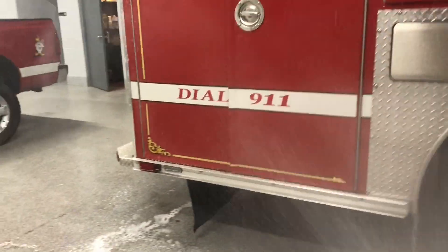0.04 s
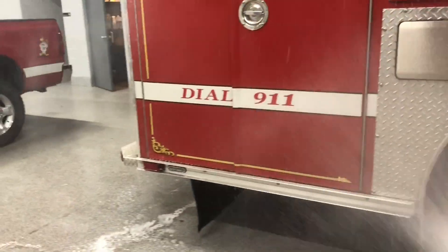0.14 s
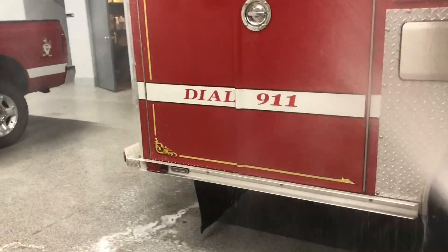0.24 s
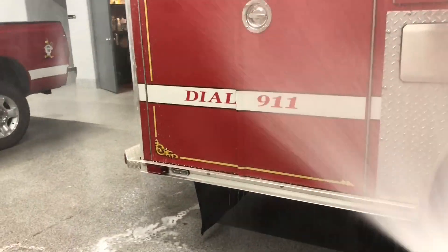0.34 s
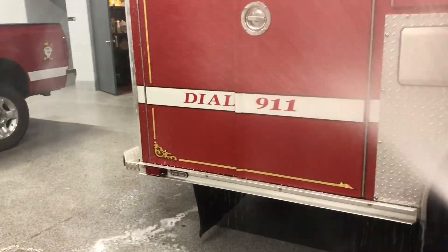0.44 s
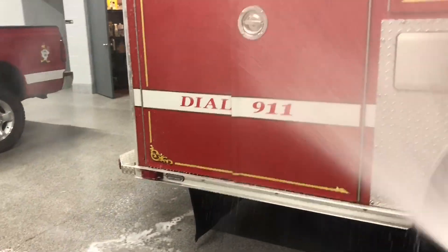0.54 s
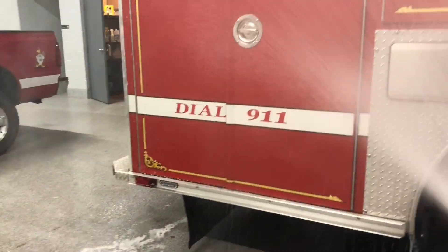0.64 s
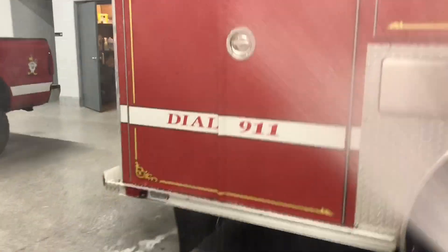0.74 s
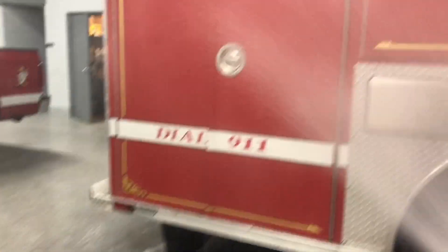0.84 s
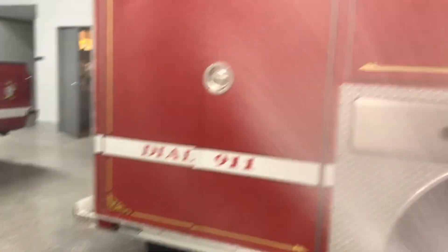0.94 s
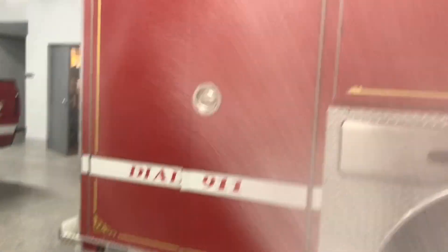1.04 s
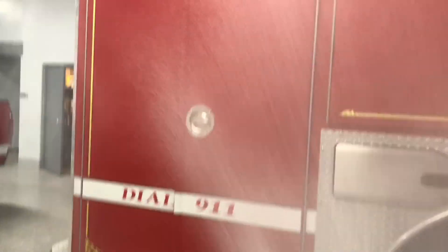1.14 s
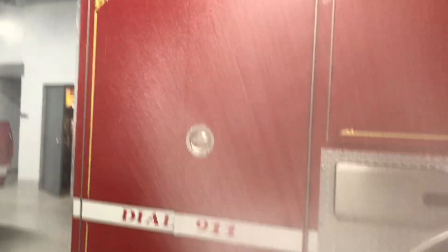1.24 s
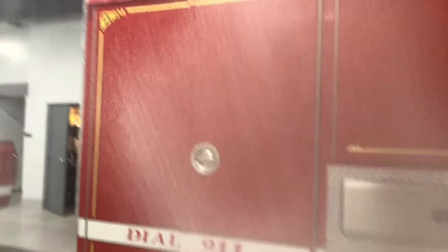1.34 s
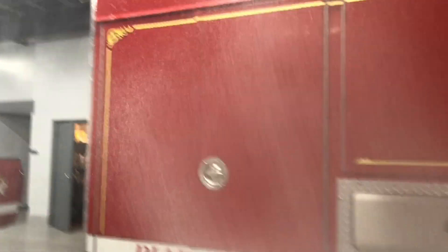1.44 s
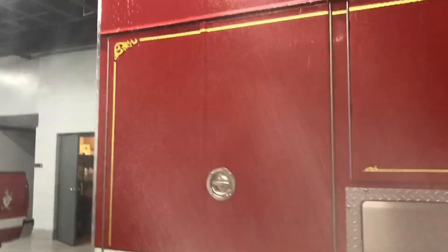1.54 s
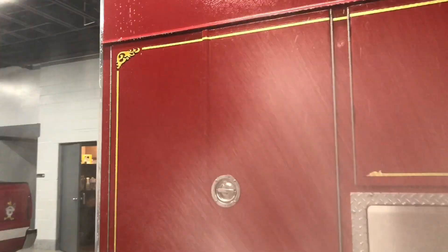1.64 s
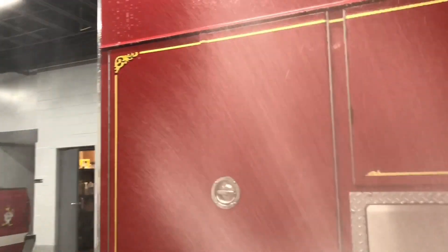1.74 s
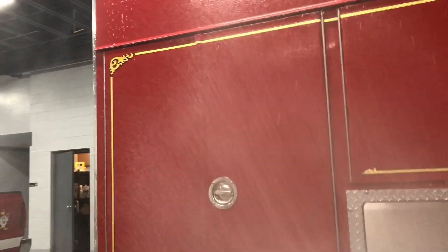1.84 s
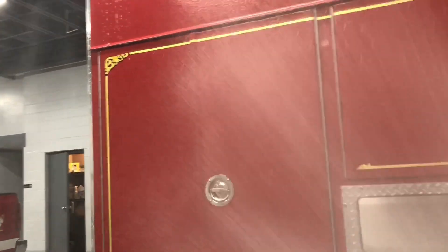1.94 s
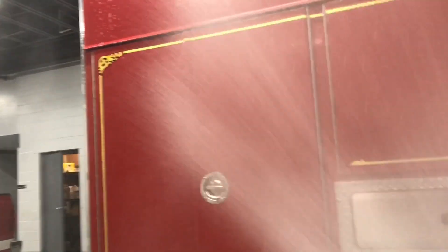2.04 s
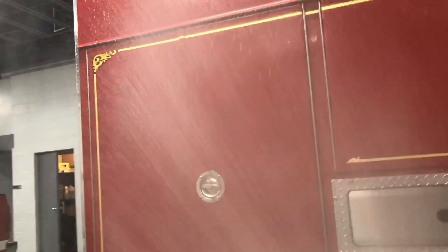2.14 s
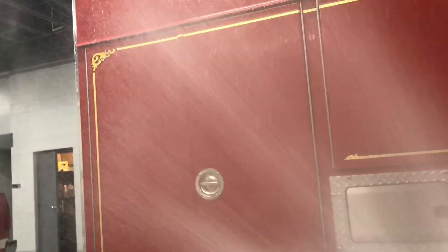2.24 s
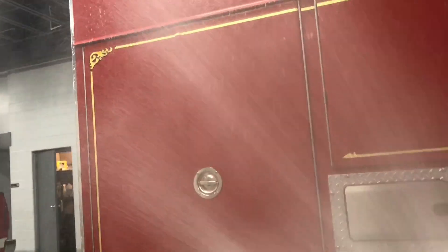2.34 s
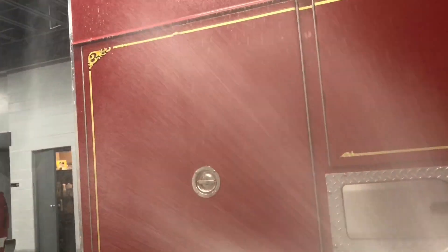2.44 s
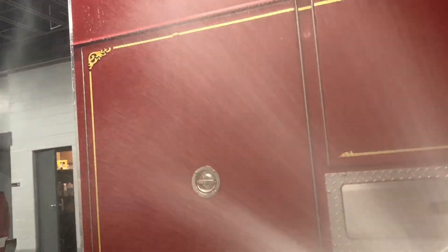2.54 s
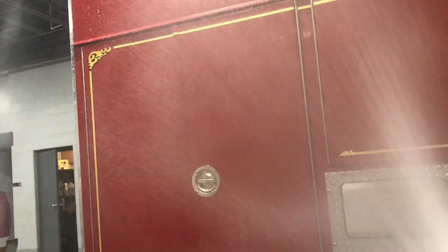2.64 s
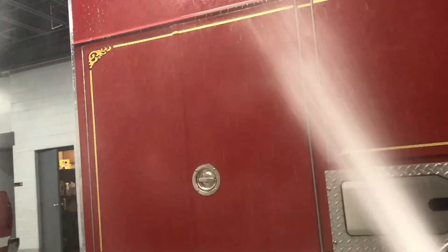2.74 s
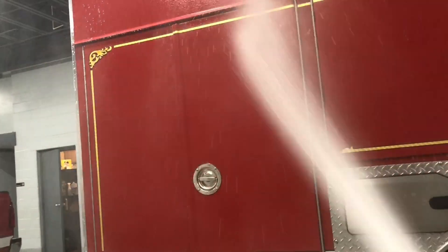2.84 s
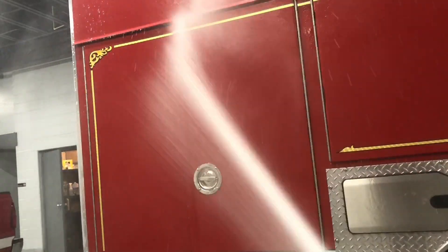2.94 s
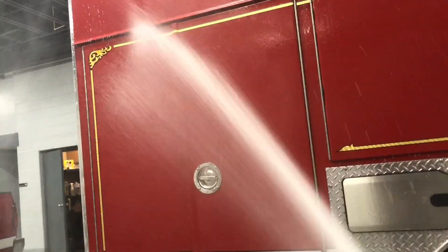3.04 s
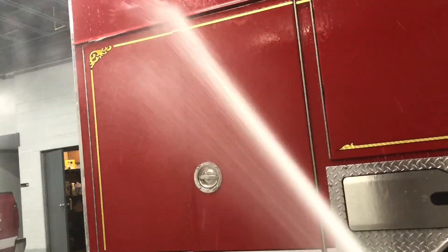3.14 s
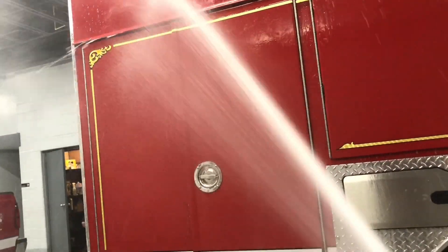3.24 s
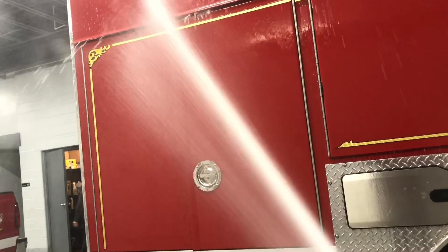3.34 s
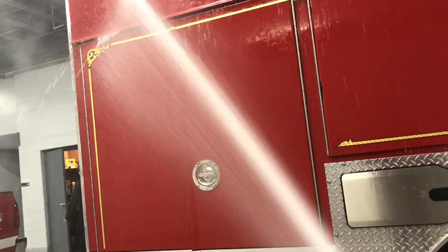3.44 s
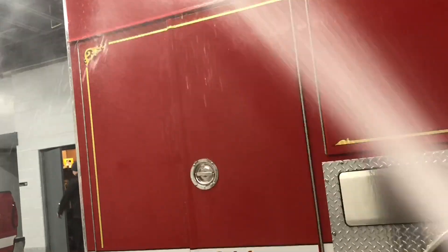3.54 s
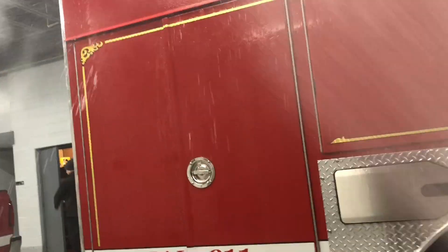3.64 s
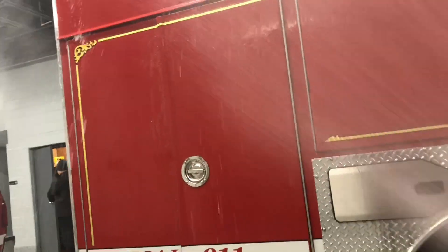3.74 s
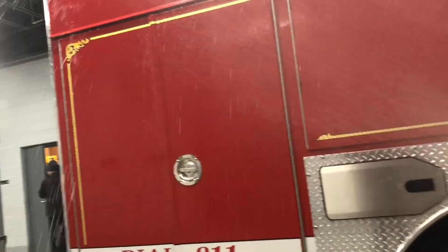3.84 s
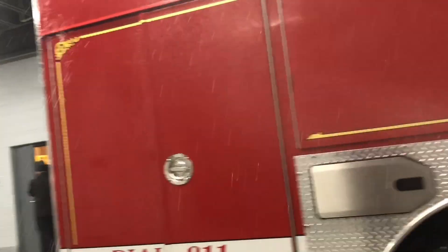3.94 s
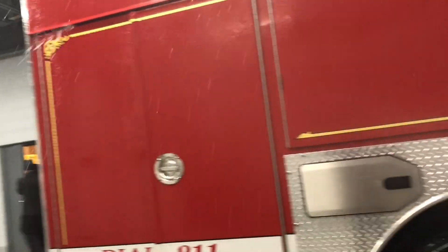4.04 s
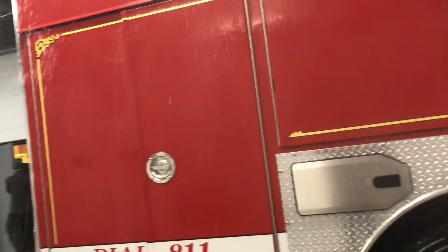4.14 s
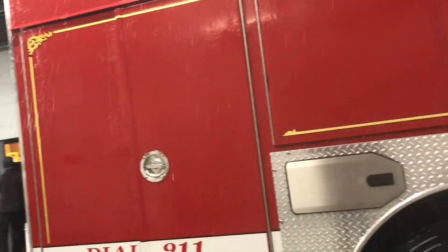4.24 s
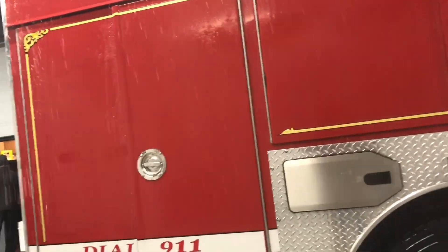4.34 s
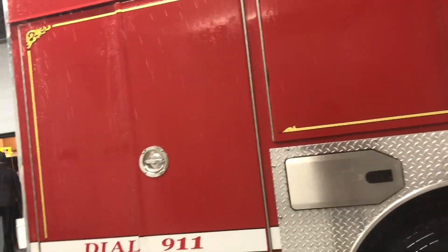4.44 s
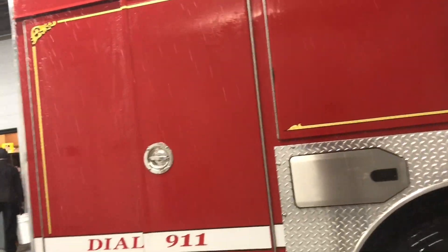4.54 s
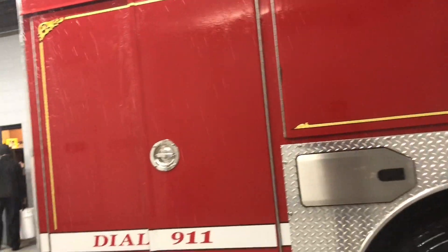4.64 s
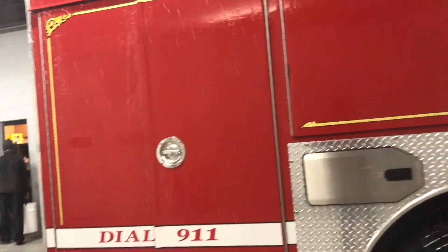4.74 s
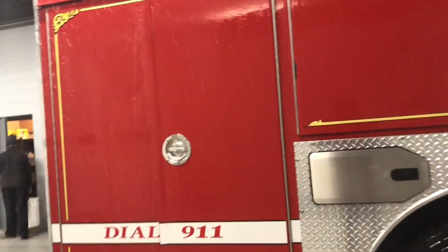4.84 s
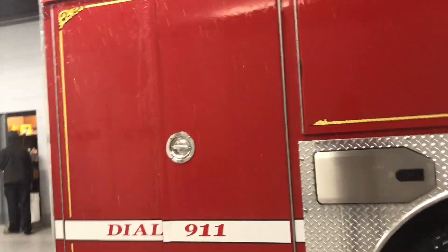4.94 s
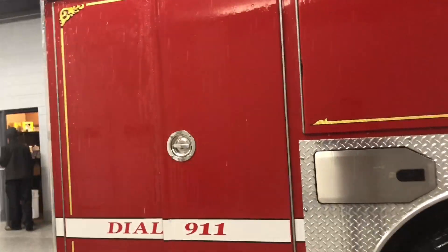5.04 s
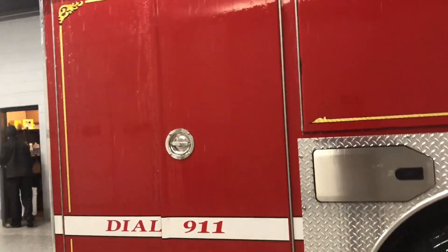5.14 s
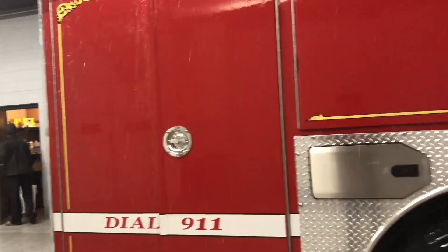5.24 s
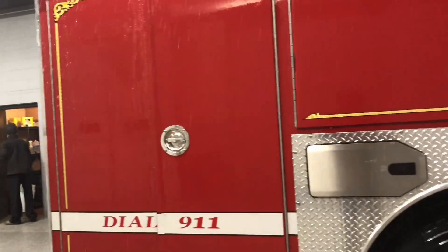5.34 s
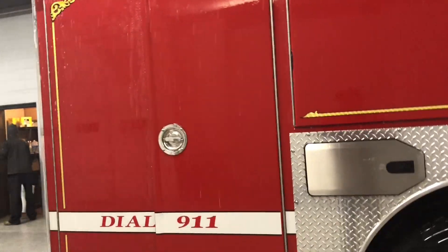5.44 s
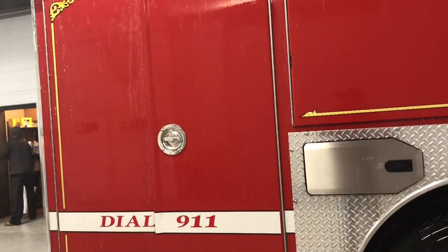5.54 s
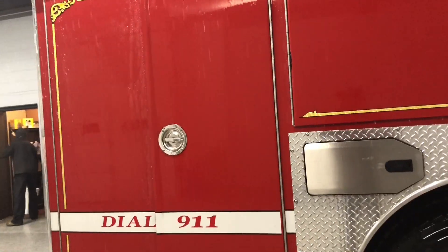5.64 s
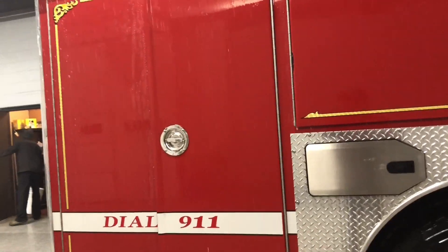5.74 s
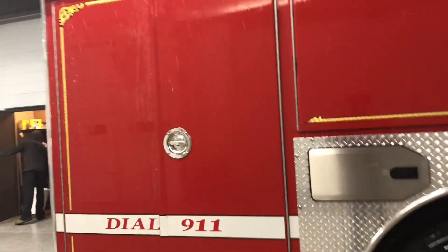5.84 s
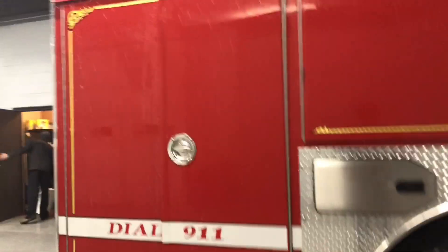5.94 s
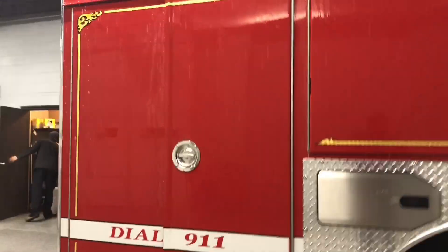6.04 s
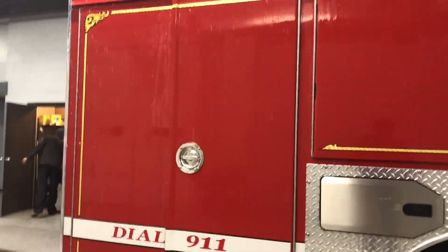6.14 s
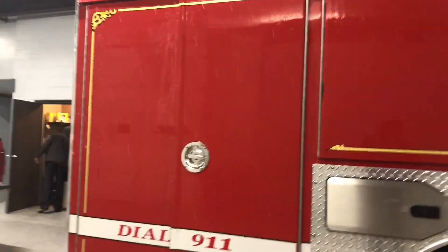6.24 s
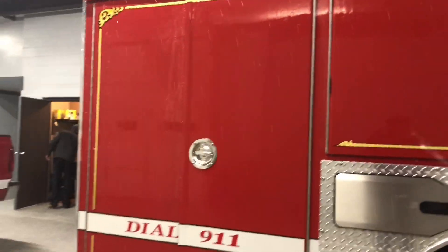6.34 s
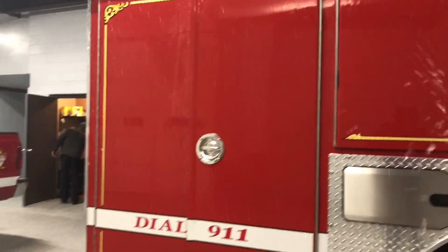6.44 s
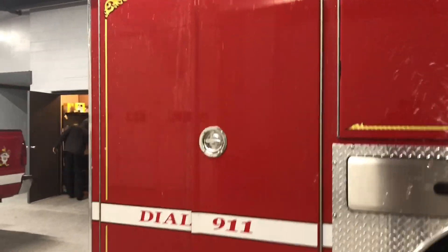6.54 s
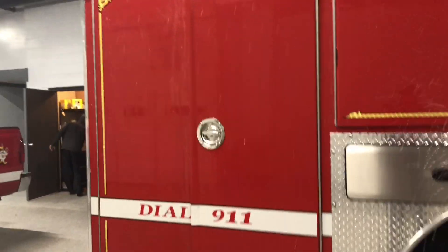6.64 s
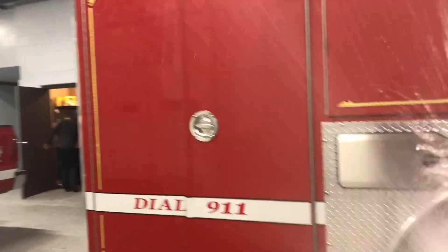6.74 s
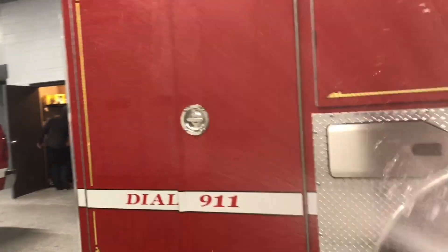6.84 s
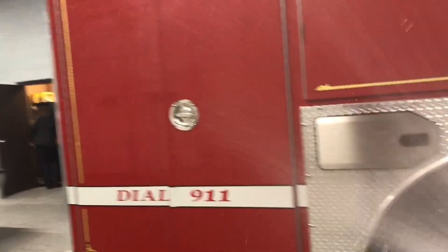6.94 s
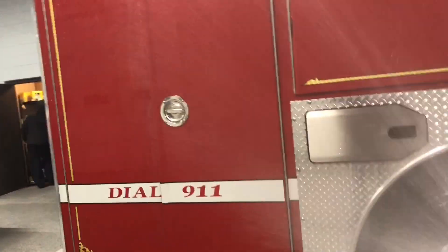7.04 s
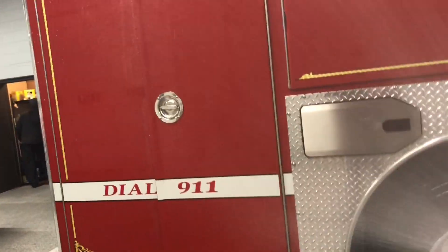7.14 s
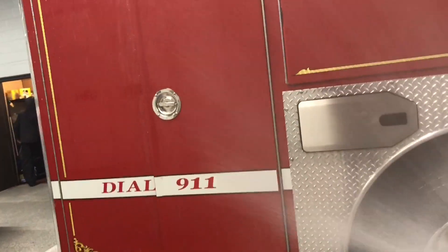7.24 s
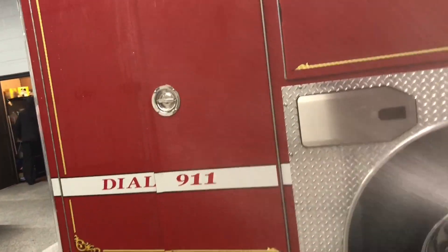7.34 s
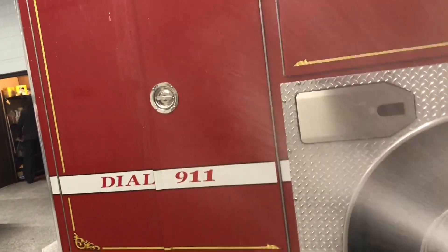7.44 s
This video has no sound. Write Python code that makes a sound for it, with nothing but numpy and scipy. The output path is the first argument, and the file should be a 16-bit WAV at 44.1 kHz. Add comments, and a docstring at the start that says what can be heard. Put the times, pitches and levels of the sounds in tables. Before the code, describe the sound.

A hose sprays hard on a truck's metal side in a garage, shuts off, leaves water dripping, then starts again.

```python
"""A wide fan of hose water drums and patters on the side of a truck, over the rumble of garage ventilation.
It narrows to a hissing jet, widens again and is shut off with a faint whistle of the valve. Water runs
off and drips onto the wet floor, something bangs across the bay and later thuds, and the spray starts
again on tread plate. The water sounds are random droplet impacts, coloured by the resonances of the
surfaces they strike; the bay adds its reverberation."""
import sys
import numpy as np
from scipy import signal
from scipy.fft import rfft, irfft
from scipy.io import wavfile
from scipy.ndimage import map_coordinates

SR = 44100
rng = np.random.default_rng(int(sys.argv[2]) if len(sys.argv) > 2 else 0)


def put_to_file(sound):
    """Save the sound as 16-bit audio at rate SR, in the file named by the first command-line argument."""
    columns = np.atleast_2d(sound).T  # one column per channel
    safe = np.clip(columns, -1, 1)
    whole_steps = np.round(safe * 32767)
    wavfile.write(sys.argv[1], SR, whole_steps.astype(np.int16))


N = 329427
TIME = np.arange(N) / SR
BAND_LIMIT_HZ = 15800
NARROW_AT_S, WIDEN_AT_S = 2.6, 3.544  # the nozzle is turned to a jet and back to a fan
SHUT_AT_S, OPEN_AT_S, SPREAD_S = 3.868, 6.682, 0.074  # the flow ends, restarts and spreads to a fan


def amp(db):
    """Amplitude ratio of a level in decibels."""
    return 10 ** (np.asarray(db) / 20)


def unit_rms(x):
    """Normalisation to an rms of 1."""
    return x / np.sqrt(np.mean(x ** 2) + 1e-20)


def at_hz(points, hz):
    """Interpolation along a logarithmic frequency axis."""
    f, value = np.transpose(points)
    return np.interp(np.log(hz + 1), np.log(f + 1), value)


def add(mix, start_s, sound):
    """Superposition of a sound on the mix."""
    part = mix[round(start_s * SR):][:len(sound)]
    part += sound[:len(part)]


def ramp(start_s, length_s):
    """Linear rise from 0 to 1."""
    return np.clip((TIME - start_s) / length_s, 0, 1)


def swell(top_s, db, rise_s, fall_s):
    """Gaussian envelope with separate widths before and after its top."""
    return amp(db) * np.exp(-((TIME - top_s) / np.where(TIME < top_s, rise_s, fall_s)) ** 2)


def waver(rate_hz):
    """Random modulation: low-pass noise of rms 1."""
    hz = np.fft.rfftfreq(N, 1 / SR)
    return unit_rms(irfft(rfft(rng.standard_normal(N)) / (1 + (hz / rate_hz) ** 2), N))


def impacts(per_s, spread_db):
    """Shot noise: independent impulses of random size and sign; rms 1."""
    size = amp(spread_db * np.minimum(rng.exponential(1, N), 6))
    return unit_rms(size * rng.choice([-1, 1], N) * (rng.random(N) < per_s / SR))


def colour(x, spectrum, rings=()):
    """Minimum-phase filtering imposes a spectrum while clicks keep their sharp fronts; rms 1."""
    hz = abs(np.fft.fftfreq(2 ** 13, 1 / SR))
    db = at_hz(spectrum, hz) + sum(lift / (1 + (2 * (hz - f) / width) ** 2) for f, width, lift in rings)
    response = np.exp(np.conj(signal.hilbert(np.log(amp(db)))))
    taps = np.fft.ifft(response).real[:2 ** 12]
    return unit_rms(signal.oaconvolve(x, taps)[:len(x)])


def resonate(x, hz, width_hz):
    """Forced response of a damped resonator whose frequency may move."""
    carrier = np.exp(2j * np.pi * np.cumsum(hz * np.ones(len(x))) / SR)
    pole = np.exp(-np.pi * width_hz / SR)
    return 2 * (carrier * signal.lfilter([1 - pole], [1, -pole], x / carrier + 1e-18)).real


def narrow_band(x, hz, width_hz):
    """Two resonators in cascade pass a band with steeper skirts; rms 1."""
    return unit_rms(resonate(resonate(x, hz, width_hz), hz, width_hz))


def narrowed():
    """Nozzle setting over time: 0 is the wide fan, 1 the narrow jet."""
    return ramp(NARROW_AT_S, 0.042) - ramp(WIDEN_AT_S, 0.15)


def fan_db(sweep):
    """Angle of incidence: a fan that meets the metal squarely patters more and throws less mist."""
    s, splash_db, mist_db = np.transpose(sweep)
    patter_db = splash_db - 6.5 - 0.091 * (mist_db + 2.5)
    return np.array([np.interp(TIME, s, db) for db in (patter_db, splash_db, splash_db + mist_db)])


# The hand sweeps the fan over painted panels, and later over tread plate.
# Each row: time in seconds, relative splash level in dB, mist level against the splash in dB.
AIM_ON_PANELS = [(0.0, -29.5, -4), (0.19, -28.5, -3), (0.35, -24.5, -2), (0.88, -25, -2.5), (1.01, -23, -1),
                 (1.37, -22.5, -6.5), (1.49, -25, -6), (1.69, -21.5, -5.5), (1.85, -24.5, -4.5),
                 (2.01, -22, -1.5), (2.46, -23.5, -2), (2.6, -21.5, -2.5)]
AIM_ON_TREAD = [(6.71, -27, 2), (6.758, -28.5, 2), (6.888, -28.5, -3), (7.008, -29, 4), (7.192, -27.5, -4),
                (7.434, -25.5, -2.5), (7.45, -26.5, -4)]
def band_gains():
    """Aim, nozzle and flow set the excitation of three bands: low patter, splash and fine mist."""
    # Each triple is (patter, splash, mist).
    jet_db = (-37, -27, -30)
    raised_fan_db = (0.5, -1, -1.5)  # after the jet, the fan lands higher up the side
    seam_lift_db, seam_db_per_s = (-0.5, 8.5, 5.5), (2.5, 0.5, -4.5)  # the jet slides along a door seam
    seam_from_s, seam_to_s, edge_s = 2.885, 3.491, 0.0094
    on_seam = ramp(seam_from_s, edge_s) - ramp(seam_to_s - edge_s, edge_s)
    seam_db = np.outer(seam_lift_db, on_seam) + np.outer(seam_db_per_s, on_seam * (TIME - seam_from_s))
    wide_db = fan_db(AIM_ON_PANELS) + np.outer(raised_fan_db, TIME > WIDEN_AT_S)
    narrow = narrowed()
    panel_db = (1 - narrow) * wide_db + np.outer(jet_db, narrow) + seam_db
    release_s, squeeze_s = 0.2, 0.022  # the trigger is let go slowly and squeezed fast
    flow = 1 - ramp(SHUT_AT_S - release_s, release_s)
    opened, spread = ramp(OPEN_AT_S, squeeze_s), ramp(OPEN_AT_S, SPREAD_S)
    restart = np.array([opened * spread, opened, opened])  # the patter builds as the fan spreads
    return np.sqrt(flow) * amp(panel_db) + restart * amp(fan_db(AIM_ON_TREAD))


def aimed(x, gains):
    """A crossover divides the sound into patter, splash and mist, each with its own gain."""
    hz, spectrum = np.fft.rfftfreq(N, 1 / SR), rfft(x)
    patter = 1 / (1 + (hz / 3650) ** 20)
    mist = 1 - 1 / (1 + (hz / 11500) ** 20)
    splash = 1 - patter - mist
    parts = [unit_rms(irfft(spectrum * band * (hz < BAND_LIMIT_HZ), N)) for band in (patter, splash, mist)]
    return (gains * parts).sum(axis=0)


# Spectra of the fan on painted panels, of the narrow jet and of the fan on tread plate.
# Each row: frequency in Hz, relative spectral density in dB.
PANEL_SPECTRUM = [(100, -16), (200, -6.5), (280, -4), (450, -5), (1500, -4), (3500, -4.5), (4400, 0),
                  (5800, -1.5), (7400, -3.5), (9100, 1.6), (11200, 1), (12200, -2), (13600, -2.5),
                  (15800, -5)]
JET_SPECTRUM = [(100, -20), (170, -14.5), (300, -16), (550, -20.5), (2300, -21.5), (3500, -17.5),
                (4200, -7.5), (5400, 4), (5900, 4), (7800, -2.5), (9500, 2), (10500, -5.5), (13000, -17),
                (15800, -22)]
TREAD_SPECTRUM = [(100, -24), (200, -13), (280, -6.5), (600, -5), (1500, -5.5), (3500, -7.5), (4400, -7),
                  (5700, -5), (7600, -8.5), (9300, -5), (11700, -2.5), (12500, -7), (14200, -4),
                  (15500, -4)]
# Peaks and notches in those spectra. Each row: centre in Hz, width in Hz, lift in dB.
PANEL_RESONANCES = [(920, 740, 2.5), (1840, 520, 2.5), (2980, 770, 3.5), (4120, 590, 3), (5560, 940, 3),
                    (6480, 260, 1)]
JET_RESONANCES = [(5460, 130, 1.5), (6700, 50, -8), (7460, 50, -3), (9700, 150, 3)]
TREAD_RESONANCES = [(1080, 300, 0.94), (1800, 320, 2.8), (2900, 400, 2.9), (4030, 340, 4), (5330, 410, 4),
                    (6550, 300, 2.4)]
def spray():
    """Impact noise: droplets excite the metal, and clumps in the stream modulate all bands together."""
    on_tread, gains = TIME >= OPEN_AT_S, band_gains()
    droplets = impacts(per_s=22000, spread_db=2.0) + 0.7 * rng.standard_normal(N)
    hits = amp(0.82 * waver(rate_hz=130)) * droplets
    panels = aimed(colour(hits, PANEL_SPECTRUM, PANEL_RESONANCES), gains)
    tread = aimed(colour(hits, TREAD_SPECTRUM, TREAD_RESONANCES), gains)
    fan = np.where(on_tread, tread, panels)
    slugs = amp(1.4 * waver(rate_hz=430)) * rng.standard_normal(N)  # the jet breaks up and sputters
    jet = aimed(colour(slugs, JET_SPECTRUM, JET_RESONANCES), gains)
    spit = 1 - ramp(OPEN_AT_S, SPREAD_S)  # the stream restarts narrow
    focus = 0.8 * np.where(on_tread, spit, narrowed())
    return amp(-0.62) * np.sqrt(1 - focus) * fan + amp(-0.4) * np.sqrt(focus) * jet


def side_reflection(x, delay_ms, drift_ms, db):
    """Comb filtering: sound interferes with its echo off the truck, whose path changes as the hand moves."""
    lag = (delay_ms + drift_ms * waver(rate_hz=0.7)) * SR / 1000
    return x + amp(db) * map_coordinates(x, [np.arange(N) - lag], order=3)


# The sheet's resonance shifts as the fan moves over it. Each row: time in seconds, frequency in Hz.
SHEET_RESONANCE = [(0.03, 306), (0.17, 350), (0.33, 344), (0.64, 262), (0.87, 298)]
# The thick of the fan lands on the sheet. Each row: time in seconds, level in dB.
SHEET_SURGES = [(0.36, -31.5), (0.6, -29.5), (0.67, -36.5), (0.87, -33)]
def drumming():
    """Forced vibration: heavy drops shake the thin sheet by the wheel, a moving ring over a dull body."""
    hz = np.interp(TIME, *np.transpose(SHEET_RESONANCE))
    ring = narrow_band(impacts(per_s=1500, spread_db=1.0), hz, width_hz=53)
    body_spectrum = [(110, -23), (170, -4.5), (260, -3), (370, -2.0), (440, -19), (800, -49)]
    body = colour(impacts(per_s=1700, spread_db=5.5), body_spectrum)
    on_sheet = ramp(0.005, 0.05) - ramp(0.89, 0.11)
    surges = sum(swell(s, db, rise_s=0.045, fall_s=0.045) for s, db in SHEET_SURGES)
    return on_sheet * np.hypot(amp(-36.5), surges) * unit_rms(ring + 1.02 * body)


# The rumble of moving air. Each row: frequency in Hz, relative spectral density in dB.
AIR_SPECTRUM = [(24, -38), (40, -21.5), (108, -2.5), (129, -4), (156, -10.5), (238, -11.5), (259, -13.5),
                (337, -17.5), (415, -19.5), (478, -22.5), (677, -23.5), (944, -24), (1210, -22.5),
                (1620, -21), (2600, -31), (3380, -34), (5720, -120)]
# Its drones and faint whines. Each row: centre in Hz, resonator width in Hz, level in dB.
AIR_DRONES = [(91, 13, -61), (118.4, 14, -53), (984, 140, -61), (1385, 57, -66), (1560, 6.9, -67),
              (1715, 22, -65)]
def ventilation():
    """Flow noise: moving air makes a steady broadband rumble with a few narrow droning bands."""
    air = amp(-44.5) * colour(rng.standard_normal(N), AIR_SPECTRUM)
    for hz, width_hz, db in AIR_DRONES:
        air += amp(db) * narrow_band(rng.standard_normal(N), hz, width_hz)
    return air


def valve():
    """Flow through a constriction: the valve whistles as it closes and fizzes just before it opens."""
    whistle = narrow_band(rng.standard_normal(N), hz=8600, width_hz=950)
    fizz_spectrum = [(3000, -34), (8000, -14), (13000, 0), (15800, 5), (17000, -30)]
    fizz = colour(impacts(per_s=8000, spread_db=-1.0), fizz_spectrum)
    return (swell(top_s=3.7, db=-28, rise_s=0.062, fall_s=0.075) * whistle
            + swell(top_s=6.37, db=-50, rise_s=0.06, fall_s=0.26) * fizz)


# Small drops on the wet floor. Each row: frequency in Hz, relative spectral density in dB.
FLOOR_SPECTRUM = [(1000, -31), (2300, -1.5), (3200, -1), (5800, 1.5), (8300, -1), (11000, -3), (15800, -4),
                  (18000, -28)]
def runoff():
    """Damped oscillations: small drips from the truck's edges tick in clusters over a thin trickle."""
    t, ticks = TIME[:SR // 100], np.zeros(N)
    for hz in np.geomspace(3300, 12500, num=24):
        age = hz * t / rng.uniform(0.8, 3.2)  # each tick peaks after 0.8 to 3.2 cycles
        tick = age * np.exp(-age) * np.sin(2 * np.pi * hz * t)
        train = signal.oaconvolve(impacts(per_s=45, spread_db=3.0), tick)[:N]
        ticks += amp(at_hz(FLOOR_SPECTRUM, hz)) * np.sqrt(hz) * unit_rms(train)
    clusters = amp(1.8 * waver(rate_hz=24))
    trickle = colour(impacts(per_s=9000, spread_db=3.5), FLOOR_SPECTRUM)
    since_shut_s = np.maximum(TIME - SHUT_AT_S, 0)
    gush = amp(-36.5) * np.exp(-since_shut_s / 0.3)
    seep = amp(-44 - since_shut_s)  # thins by 1 dB a second
    flow = (since_shut_s > 0) * np.hypot(gush, seep)
    return flow * clusters * (amp(-6) * unit_rms(ticks) + amp(-5) * trickle)


# A clatter across the bay. Each row: start in seconds, relative level in dB.
BANG_BLOWS = [(3.931, -33), (3.984, -36.5), (4.003, -42), (4.05, -41.5)]
# The spectrum of a blow. Each row: frequency in Hz, relative spectral density in dB.
BANG_SPECTRUM = [(120, -14.5), (290, -3), (420, -1.5), (560, 1), (800, -6.5), (1200, -9), (1800, -18),
                 (4000, -27)]
def bang():
    """Impulsive excitation: quick distant blows give decaying noise bursts, and the room reverberates."""
    out, t = np.zeros(N), TIME[:SR // 4]
    envelope = (1 - np.exp(-t / 0.0024)) * np.exp(-t / 0.03)
    for s, db in BANG_BLOWS:
        add(out, s, amp(db) * envelope * colour(rng.standard_normal(len(t)), BANG_SPECTRUM))
    return amp(4.5) * out + amp(-0.5) * reverberation(out)


def lesser_drips(count=14):
    """Random arrivals: lesser drops fall most often soon after water reaches the truck's lower edges."""
    starts_s = 4.4 + 0.3 * rng.gamma(2, size=count)
    octaves = 0.49 * np.clip(rng.standard_normal(count), -2, 2)
    return [(s, -25.5, hz) for s, hz in zip(starts_s, 7200 * 2 ** octaves)]


# Large drops on the wet floor. Each row: start in seconds, relative peak level in dB, ring in Hz.
LARGE_DRIPS = [(3.9562, -17, 6220), (4.106, -15, 8960), (4.4508, -18.5, 5880), (4.5464, -18.5, 6230),
               (4.6157, -18.5, 4390), (4.631, -21, 4580), (4.6788, -22, 6690), (4.7532, -19, 5490),
               (4.8486, -18, 6700), (4.8988, -20.5, 7670), (4.9634, -23, 6820), (5.001, -22, 5950),
               (5.1077, -23, 8530), (5.239, -21, 5750), (5.306, -23, 9150), (5.3823, -16.5, 10500),
               (5.4243, -20, 9500), (5.5035, -23.5, 6270), (5.6586, -22.5, 5520), (5.7944, -30, 6750),
               (5.918, -20.5, 6240), (6.2168, -28, 5960), (6.411, -24.5, 10900), (6.4842, -26, 3680),
               (6.673, -16, 12500)]
def drips():
    """Impact and secondary splash: each drop slaps the wet floor, then its scattered droplets land."""
    out, t = np.zeros(N), TIME[:SR // 10]
    age = t / 0.00078  # in units of the slap's duration
    high_pass = signal.butter(2, 3400, "high", fs=SR)
    for s, db, hz in list(LARGE_DRIPS) + lesser_drips():
        slap_noise, scatter_noise, clumps = rng.standard_normal((3, len(t)))
        slap = np.sign(slap_noise) * age * np.exp(1 - 2 * age)
        scatter = 0.035 * scatter_noise * np.exp(0.88 * clumps - t / 0.022)
        drip = signal.lfilter(*high_pass, resonate(slap + scatter, hz, width_hz=3700))
        add(out, s, amp(db - 1.0) * drip / abs(drip).max())
    return out


# Dull thuds. Each row: start in seconds, relative level in dB, lowest mode in Hz, rise time in
# seconds, time to decay by 60 dB in seconds.
THUD_BLOWS = [(6.377, -17.5, 134, .005, 0.066), (6.409, -24, 124.5, 0.007, 0.16),
              (6.46, -20.5, 118.7, 0.015, 0.25)]
def thuds():
    """Modal ringing: soft blows on something large and hollow excite a low mode and weak upper ones."""
    out, t = np.zeros(N), TIME[:SR // 2]
    for s, db, hz, rise_s, t60 in THUD_BLOWS:
        phase = 2 * np.pi * hz * t
        modes = np.sin(phase) + 0.17 * np.sin(1.9 * phase) + 0.029 * np.sin(4.0 * phase)
        envelope = (1 - np.exp(-t / rise_s)) * amp(-60 * t / t60)
        add(out, s, amp(db) * envelope * modes)
    return out


# The garage bay's decay. Each row: frequency in Hz, reverberation time in seconds.
BAY_T60 = [(100, 1.3), (600, 1.24), (2000, 0.6), (6000, 0.68), (15000, 0.31)]
def reverberation(x):
    """Diffuse field: dense reflections arrive after 8 ms, and each band decays at its own rate."""
    reflections = rng.standard_normal(SR) * (TIME[:SR] > 0.008)
    hz, t, bands = signal.stft(reflections, SR, nperseg=256)
    decay = amp(-60 * t / at_hz(BAY_T60, hz)[:, None])
    tail = signal.istft(bands * decay, SR, nperseg=256)[1]
    return signal.fftconvolve(x, tail / np.linalg.norm(tail))[:N]


def scene():
    """Superposition: direct and reverberant sound add at one microphone, which feeds both channels."""
    hose = side_reflection(spray(), delay_ms=2.2, drift_ms=0.277, db=-26) + valve() + drumming()
    drips_and_thuds = drips() + runoff() + thuds()
    room = reverberation(amp(-18.5) * hose + amp(-10.5) * drips_and_thuds)
    mono = hose + drips_and_thuds + room + bang() + ventilation()
    return np.array([mono, mono])


def record(dry):
    """Band limiting: the microphone cuts the deep bass, and a steep low-pass removes the top treble."""
    bass_cut = signal.butter(4, 38, "high", fs=SR, output="sos")
    low_pass = signal.firwin(1023, BAND_LIMIT_HZ, window=("kaiser", 9), fs=SR)
    return signal.oaconvolve(signal.sosfilt(bass_cut, dry), low_pass[None], "same", axes=1)


dry = scene()
out = record(dry)
put_to_file(out)
```